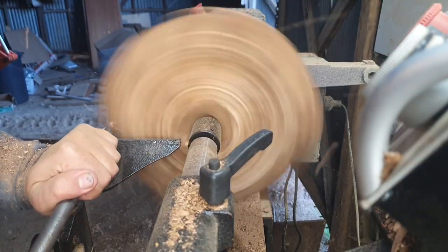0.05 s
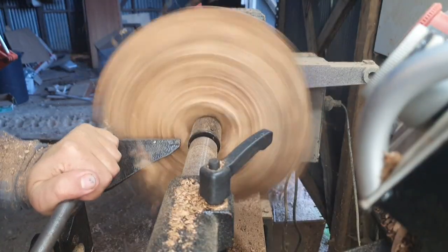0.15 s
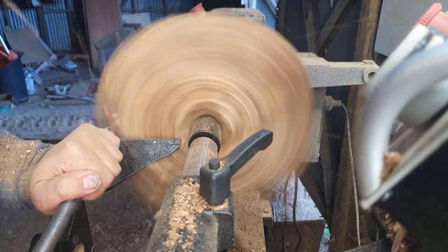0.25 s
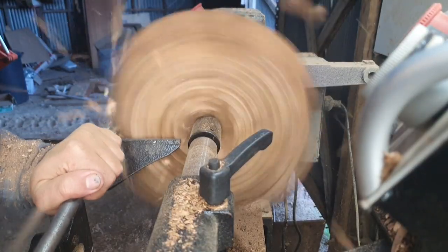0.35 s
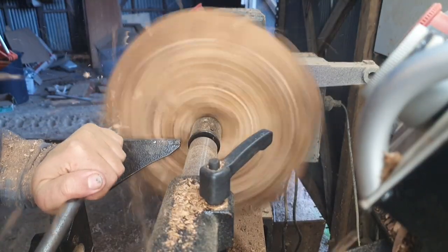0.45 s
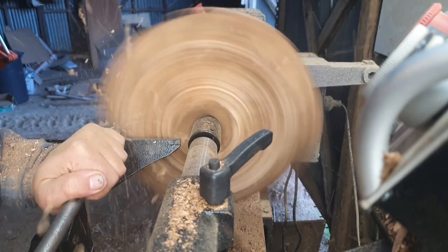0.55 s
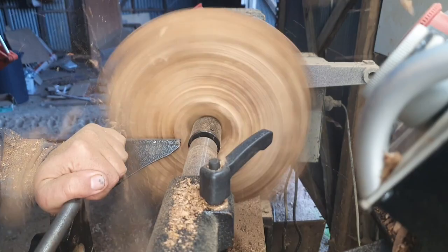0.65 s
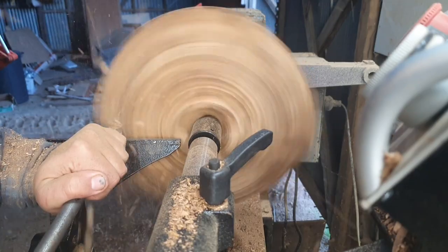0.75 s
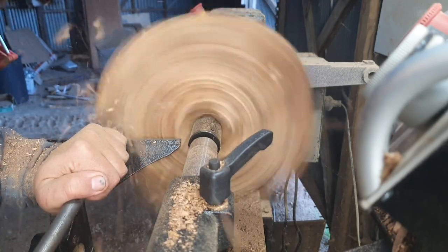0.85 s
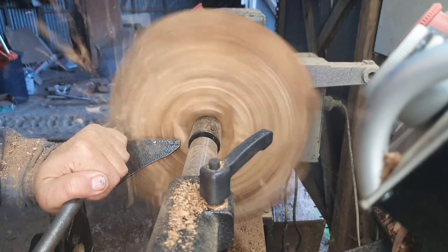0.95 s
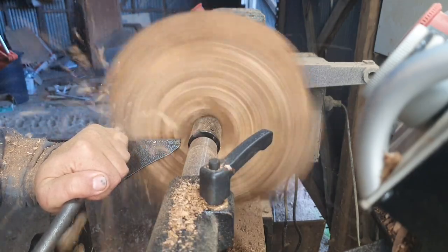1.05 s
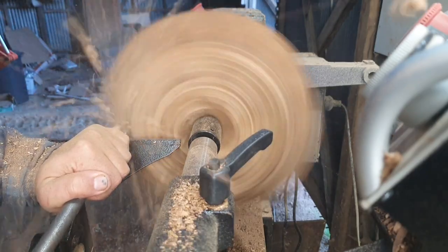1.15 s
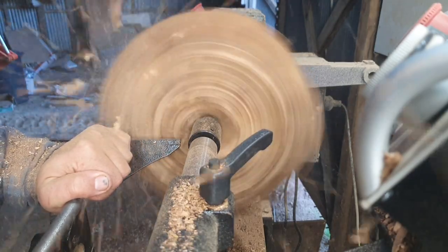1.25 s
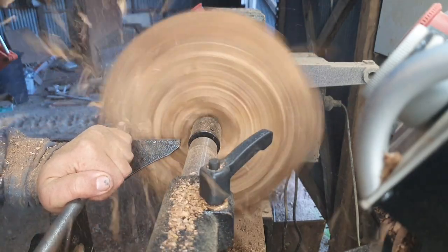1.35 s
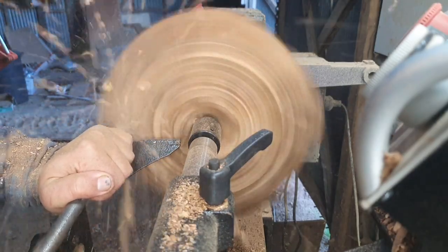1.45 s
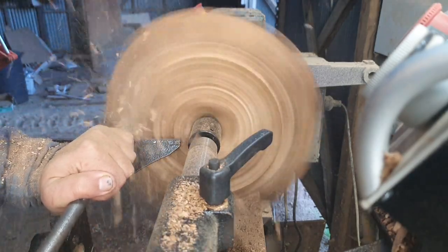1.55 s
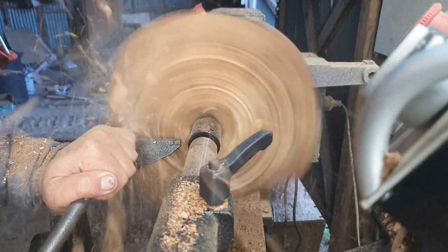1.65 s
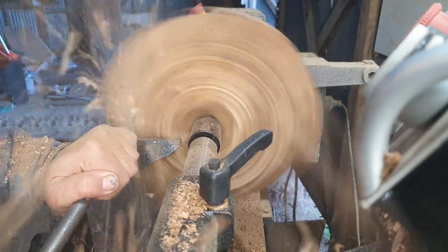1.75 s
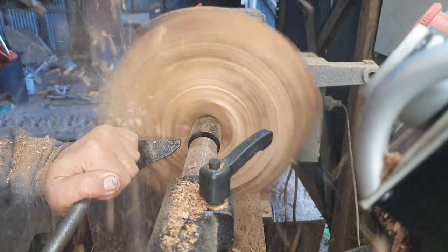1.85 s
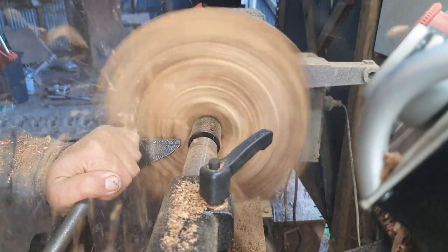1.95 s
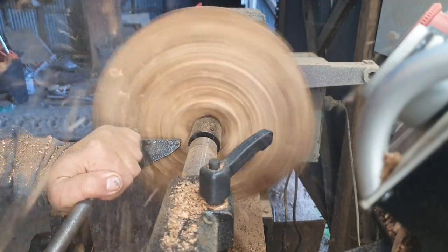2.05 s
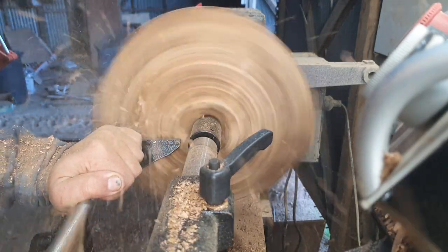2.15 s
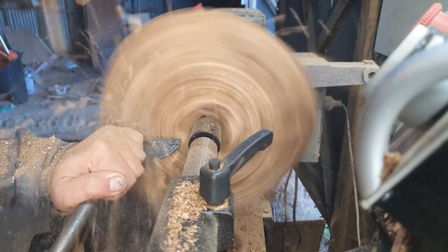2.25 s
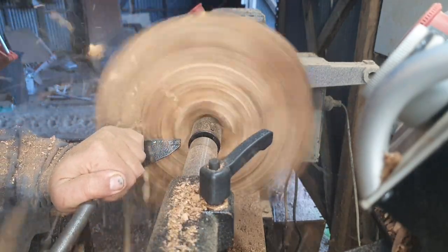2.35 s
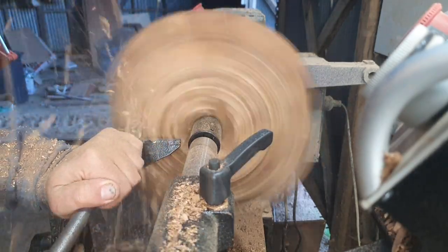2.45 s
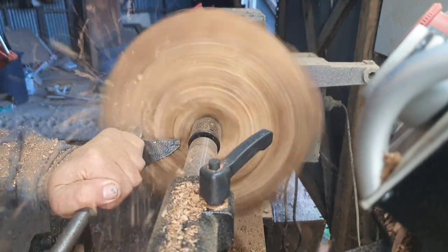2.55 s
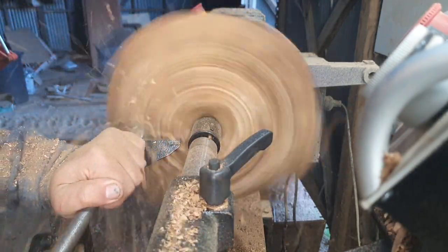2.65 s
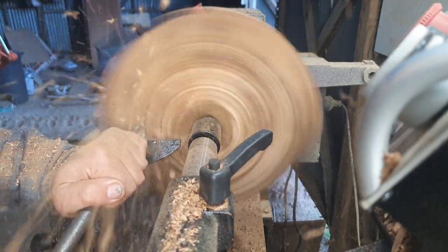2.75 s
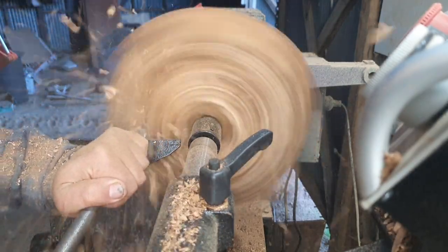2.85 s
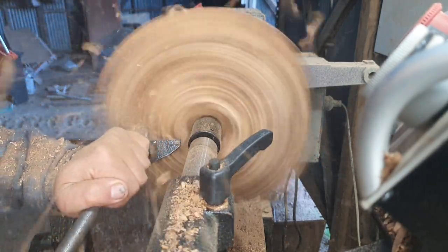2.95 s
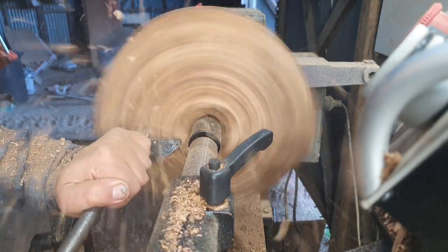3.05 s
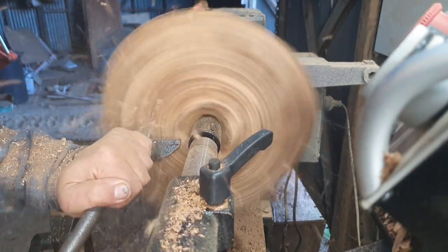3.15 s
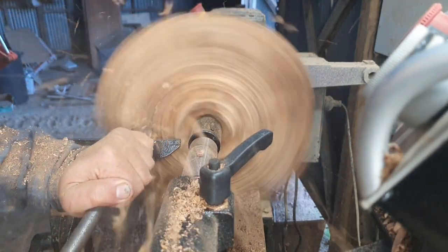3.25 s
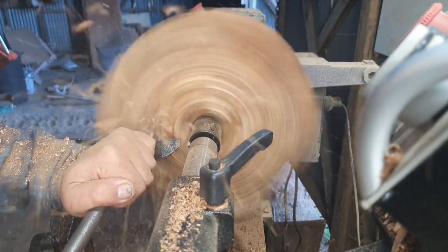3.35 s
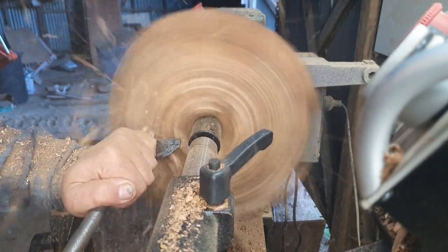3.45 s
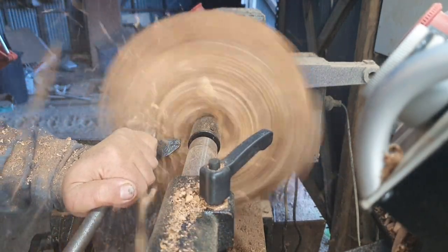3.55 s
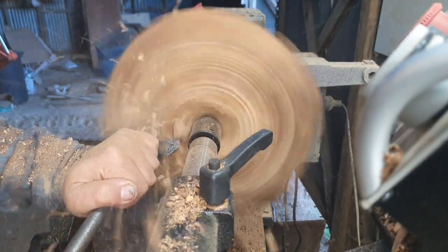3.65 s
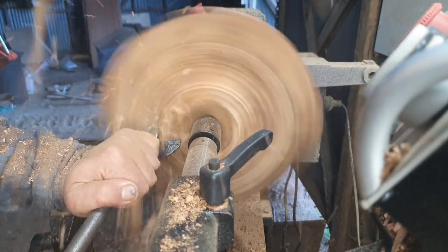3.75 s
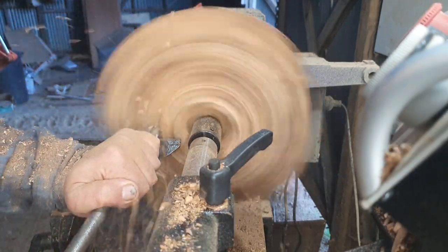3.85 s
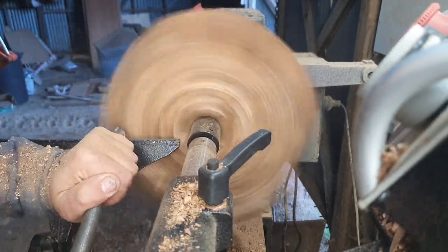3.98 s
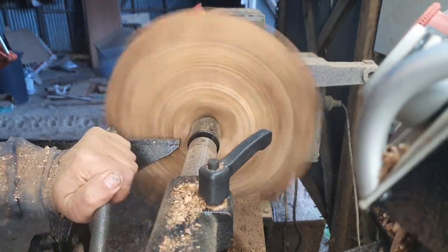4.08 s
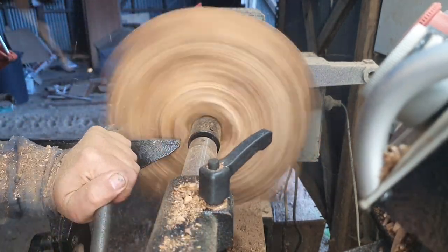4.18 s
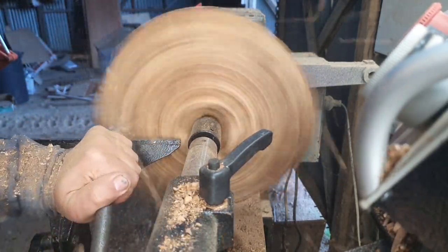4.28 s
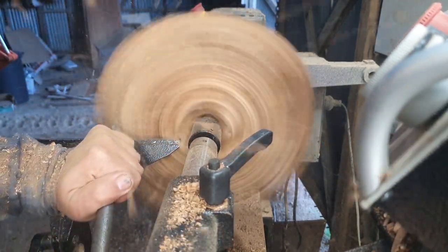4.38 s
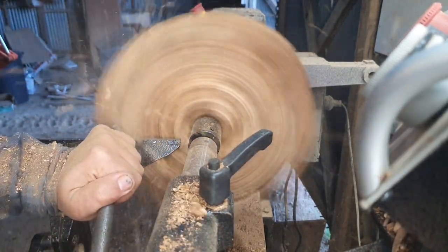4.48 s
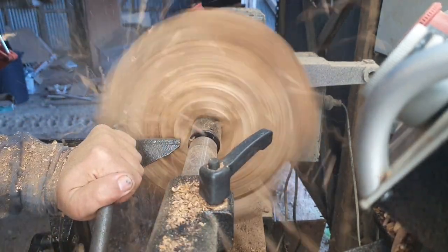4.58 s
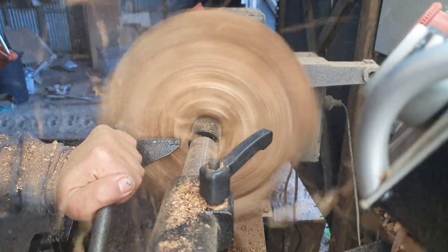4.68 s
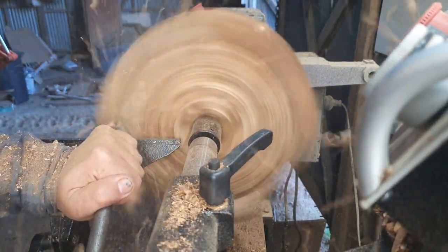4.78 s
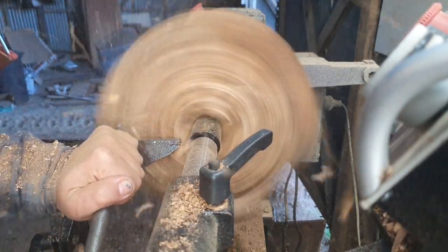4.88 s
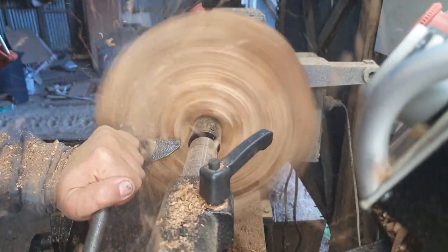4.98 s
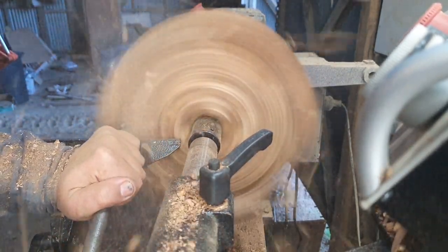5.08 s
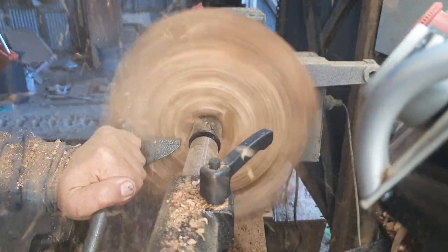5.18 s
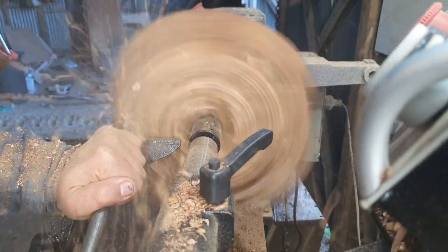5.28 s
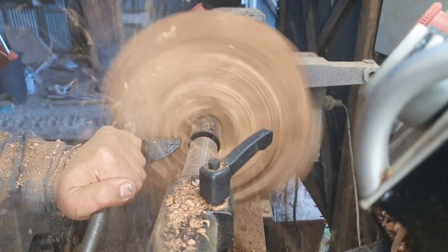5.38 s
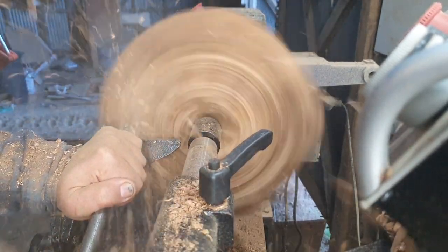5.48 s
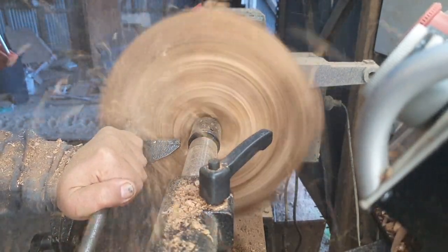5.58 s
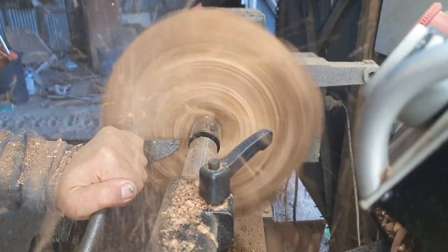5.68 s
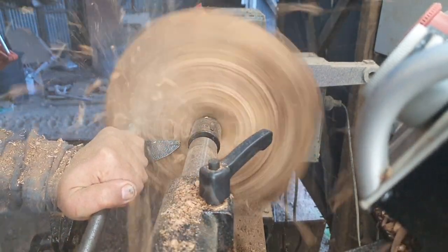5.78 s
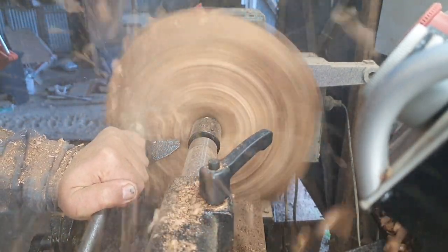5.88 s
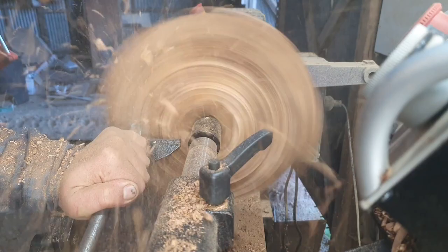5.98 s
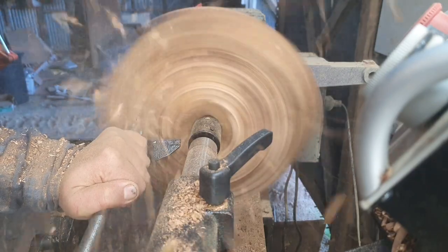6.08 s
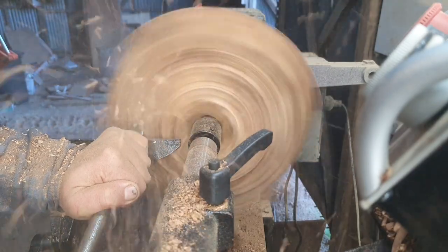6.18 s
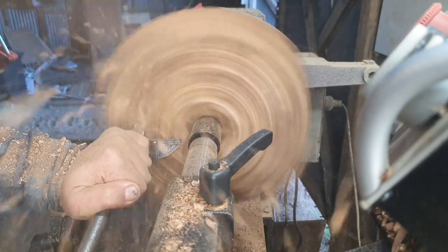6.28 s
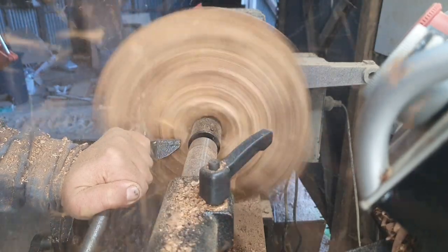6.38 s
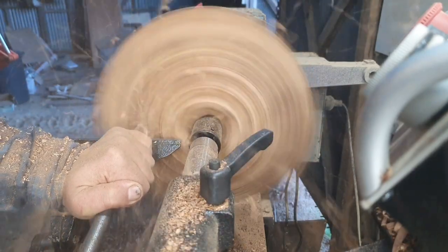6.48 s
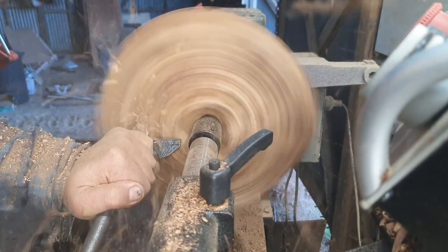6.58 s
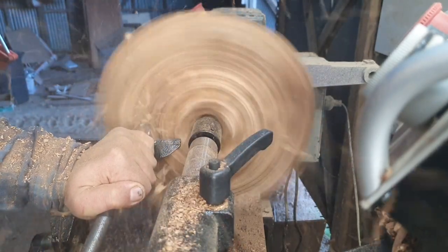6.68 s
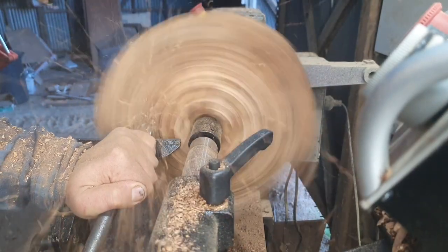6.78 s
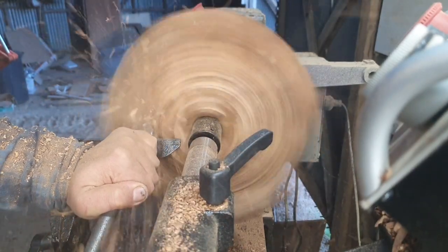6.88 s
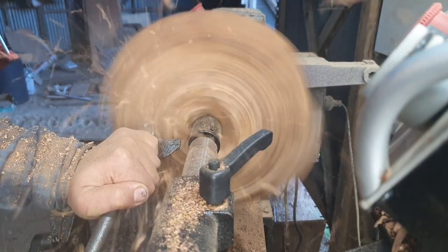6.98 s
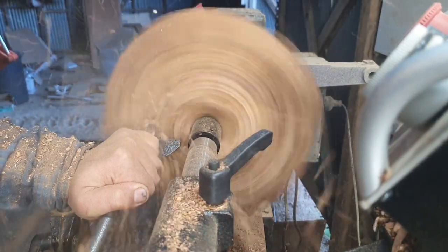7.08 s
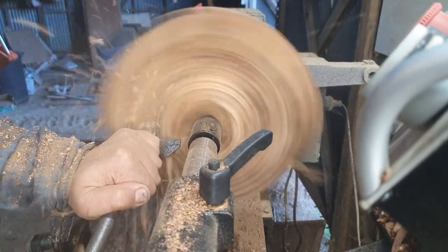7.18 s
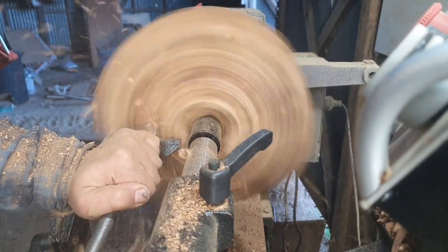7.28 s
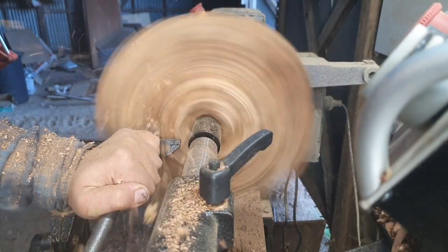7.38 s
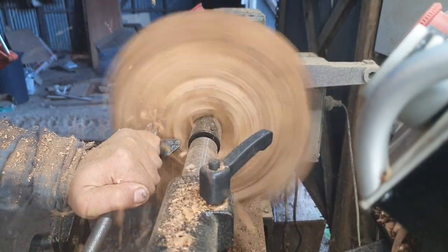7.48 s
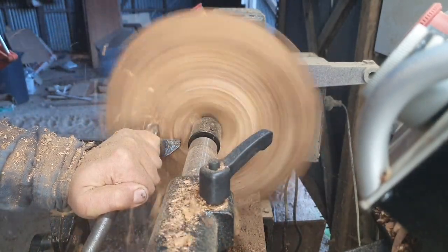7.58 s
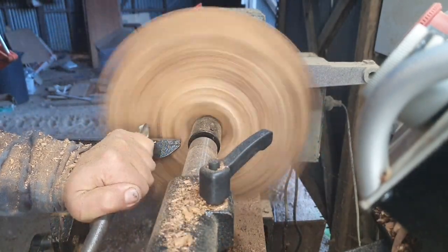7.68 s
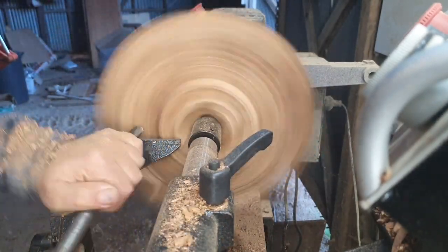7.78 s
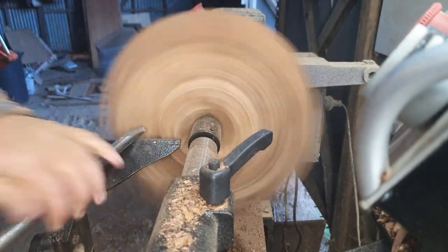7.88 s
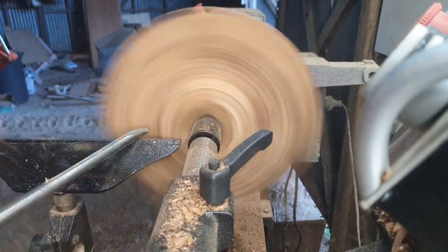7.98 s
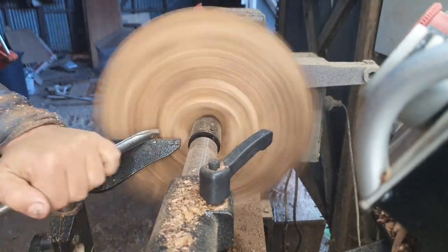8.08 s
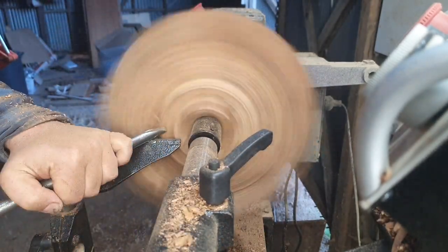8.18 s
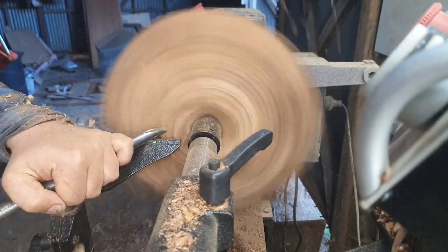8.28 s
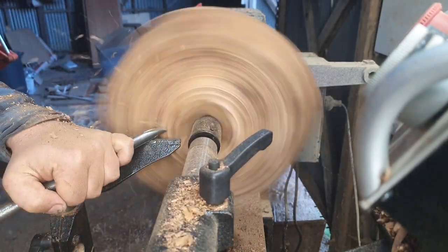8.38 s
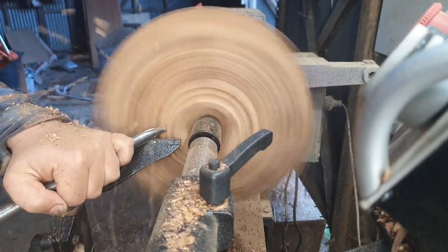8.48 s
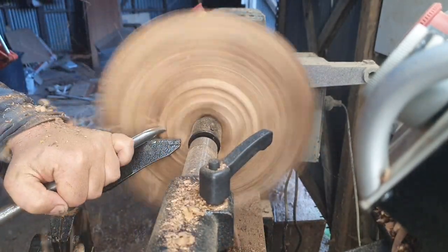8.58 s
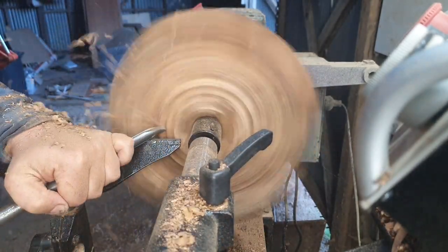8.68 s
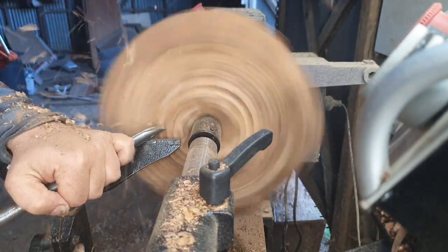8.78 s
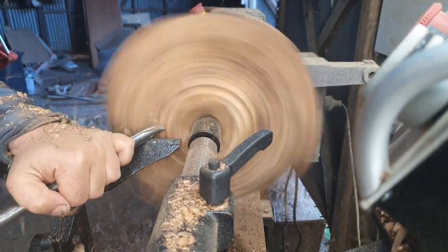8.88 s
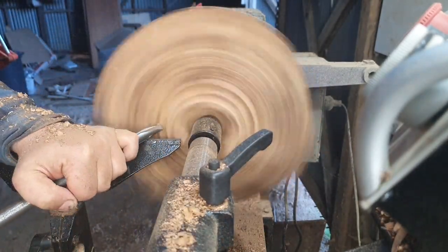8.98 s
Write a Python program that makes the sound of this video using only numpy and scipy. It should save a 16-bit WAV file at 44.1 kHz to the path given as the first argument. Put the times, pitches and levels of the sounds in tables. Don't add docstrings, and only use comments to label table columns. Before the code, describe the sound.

Harsh, buzzing scrape of steel cutting wood on a lathe, rattling with catches, stopping twice for short quiet pauses, then cutting again.

```python
import sys
import numpy as np
from scipy import signal
from scipy.fft import rfft, irfft, next_fast_len
from scipy.io import wavfile
from scipy.ndimage import uniform_filter1d, minimum_filter1d, map_coordinates

SR = 44100
rng = np.random.default_rng(int(sys.argv[2]) if len(sys.argv) > 2 else 0)


def generate_wav(sig):
    pcm = np.round(np.clip(np.atleast_2d(sig).T, -1, 1) * 32767).astype(np.int16)
    wavfile.write(sys.argv[1], SR, pcm)


def natural_amplitude(level_db):
    exponent = np.asarray(level_db, float) / 20
    return 10 ** exponent


N = 398223
TURNS_PER_S = 30.519

# edge meets wood t/s, starts to lift t/s, clear of the wood t/s
CUTTING_PASSES = [
    (0.0, 3.85, 3.91),
    (4.1445, 7.57, 7.68),
    (8.161, 9.02, 9.2),
]
# t/s, place (0 rim, 1 midway, 2 centre, 3 tool turned round)
EDGE_PLACE = [(0, 0), (.7, 0), (1.2, 1), (2.6, 1.2), (3.4, 2), (4, 2), (4.1, 0), (4.5, 0), (4.9, 1),
              (5.9, 1.2), (6.4, 2), (7.9, 2), (8, 3), (9.1, 3)]
# t/s, hiss level/dB, flute opening/dB, skew/dB
TOOL_PRESSURE = [(0.0, -28.5, -1, -1.5), (0.3, -31.5, 1.5, 4), (0.42, -25.5, 2, -1.5),
                 (0.8, -26, 1.5, -3.5), (1.2, -23.5, 0, -1), (1.75, -25.5, 1, 0), (2.56, -23, 1.5, 0.5),
                 (3.4, -21, -2, -3), (3.85, -22, -1.5, -6), (4.15, -32.5, 1, -0.5), (4.32, -25, 3.5, -1.5),
                 (4.97, -23.5, -4.5, -1), (6.1, -25, 1.5, 1.5), (6.45, -24.5, 1.5, 4.5),
                 (7.09, -21, 1.5, 0.5), (7.3, -27.5, -0.5, -0.5), (8.4, -24.5, 7, -0.5),
                 (8.86, -21.5, 4.5, 0.5)]
# t/s, lean to the left/dB, sheen of the top/dB
BODY_STANCE = [(0, -0.5, 1), (.6, -0.2, -1), (1.5, 0.5, -1.5), (2.2, -0.1, -2), (2.8, -0.5, -1),
               (3.8, 0, -1), (4.2, 0, -3), (4.7, 0.5, 5.5), (5.2, -0.5, 4), (5.7, .2, 0), (6.2, 0, 2.5),
               (7, 0, -1), (7.6, 0.2, 4), (8.2, -.3, 0), (9, 0, -10)]


def evened(x):
    return x / np.sqrt(np.mean(x ** 2) + 1e-20)


def read(points, hz, column=1):
    points = np.array(points)
    return np.interp(np.log(hz + 1), np.log(points[:, 0] + 1), points[:, column])


def bell(t, centre, half_width):
    return np.exp(-((t - centre) / half_width) ** 2)


def resonance(hz, centre_hz, width_hz):
    return 1 / (1 + (2 * (hz - centre_hz) / width_hz) ** 2)


def at_ports(same, other):
    # f/Hz, coherence (0-1), left minus right level/dB
    port_likeness = [(40, 0.9, 1), (152, 0.17, -1.5), (318, 1, 2.5), (610, 1, -1.5), (1456, 0.88, 0),
                     (2150, 0.93, 2.5), (3100, 0.51, 3), (4780, 0.64, -3.5), (5360, 0.22, -1.5),
                     (6960, 0.48, -2.5), (9300, 0.78, 0), (15000, 0.5, 1.5)]
    # f/Hz, phase by which the left leads/rad
    port_phase = [(0, 0), (2330, 0.2), (2760, 0.0), (3360, 1.1), (4050, 0.3), (4650, 0.3), (4910, -2.4),
                  (5340, -4.2), (5770, -4.4), (6720, -5.7), (7580, -12.8), (8180, -12.4), (10900, -12.7),
                  (16400, -12.5)]
    size = next_fast_len(N)
    hz = np.fft.rfftfreq(size, 1 / SR)
    like = np.clip(read(port_likeness, hz), 0, 1)
    left = rfft(same, size)
    shared = like * left * np.exp(-1j * read(port_phase, hz))
    right = shared + np.sqrt(1 - like ** 2) * rfft(other, size)
    lean = natural_amplitude(read(port_likeness, hz, column=2) / 2)
    return irfft(np.array([left * lean, right / lean]), size)[:, :N]


def shop(x):
    u = np.arange(9000) / SR
    arrivals = (rng.random((2, 9000)) < 2000 / SR) * rng.choice([-1., 1.], (2, 9000))
    taps = arrivals * natural_amplitude(-60 * u / 0.12) * (u > .004)
    return signal.oaconvolve(x, taps / np.linalg.norm(taps[0]), axes=1)[:, :N]


def idling(t):
    # start t/s, hush level/dB, hush swell/(dB/s), frame hum level/dB, hum fade/(dB/s)
    pauses = [
        (3.93, -68, 9, -49, -110),
        (7.68, -69, 20.5, -49, -500),
    ]
    # t/s, half length/s, rustle level/dB, air level/dB
    rustles = [(3.97, .02, 1, -4), (7.948, .02, 3.5, 15), (7.985, .02, 2, 11), (8.112, 0.0081, 5, -3)]
    first_tick_s, idle_turns_per_s = np.array([3.941, 7.684]), 32.9
    air_db, hum_floor_db = -10, -88
    pause = np.maximum(np.searchsorted(np.transpose(pauses)[0], t) - 1, 0)
    start, hush, swell, hum, fade = np.transpose(pauses)[:, pause]
    since = np.clip(t - start, 0, .5)
    hush_db = hush + swell * since + sum(db * bell(t, s, half) for s, half, db, _ in rustles)
    air_db = air_db + sum(db * bell(t, s, half) for s, half, _, db in rustles)
    turns = (t - first_tick_s[pause]) * idle_turns_per_s
    return hush_db, air_db, np.maximum(hum + fade * since, hum_floor_db) - hush_db, turns


def drive():
    # f/Hz, level/dB
    hush_spectrum = [(18, -60), (30, -33), (75, -23.5), (437, -7), (666, -18), (913, -17), (1010, -18),
                     (1910, -16), (2540, -15), (4650, -20), (5310, -24), (6300, -19), (8080, -23),
                     (16000, -52)]
    # f/Hz, width/Hz, level re hush/dB
    motor_tones = [(900, 6.6, -13), (3200, 97, -9), (4650, 300, -25)]
    whine_hz, whine_db = 899, -8
    size = next_fast_len(N)
    t, hz = np.arange(N) / SR, np.fft.rfftfreq(size, 1 / SR)
    hush_db, air_db, hum_db, turns = (np.interp(t, t[::32], c) for c in idling(t[::32]))
    noise = rfft(rng.standard_normal((2, N)), size)

    def shaped(gain):
        return evened(irfft(noise * gain, size)[:, :N])

    def peak(centre_hz, width_hz):
        return shaped(resonance(hz, centre_hz, width_hz))

    hush = natural_amplitude(6.5) * shaped(natural_amplitude(read(hush_spectrum, hz)) / (1 + (120 / (hz + 1)) ** 2))
    hush = hush + sum(natural_amplitude(db) * peak(f, w) for f, w, db in motor_tones)
    air = natural_amplitude(air_db + 3.5) * shaped(1 / (1 + (7000 / (hz + 1)) ** 4))
    hum = natural_amplitude(hum_db - 8.5) * (peak(455, 44) + peak(515, 36.1))
    tick = natural_amplitude(2.5) * peak(8000, 600) * np.exp(-(turns % 1) / 0.22)
    whine = natural_amplitude(whine_db) * np.sqrt(2) * np.sin(2 * np.pi * whine_hz * t)
    return at_ports(*(natural_amplitude(hush_db) * (hush + air + hum + tick + whine * [[1], [0]])))


def knocks():
    # t/s, f/Hz, width/Hz, level/dB, half length/s
    knock_events = [(3.96, 3100, 150, -66, .015), (3.985, 2300, 400, -69, .01),
                    (4.097, 3600, 600, -58, .003), (4.097, 6000, 900, -65, .003),
                    (4.105, 1360, 120, -58, .012), (7.662, 3730, 150, -52, .004),
                    (7.656, 6100, 700, -44, 0.0029), (7.775, 2500, 250, -63, 0.011),
                    (7.81, 2850, 120, -64, .025), (7.948, 4700, 1300, -49, .012),
                    (7.96, 3200, 150, -64, .05), (8.113, 1350, 200, -49, .004),
                    (8.113, 2900, 500, -56, .005)]
    out, u = np.zeros((2, N)), np.arange(-4096, 4096) / SR
    hz = np.fft.rfftfreq(len(u), 1 / SR)
    for s, centre_hz, width_hz, db, half_s in knock_events:
        noise = rng.standard_normal((2, len(u)))
        ring = irfft(rfft(noise) * resonance(hz, centre_hz, width_hz))
        first = round(s * SR) - 4096
        out[:, first:first + len(u)] += natural_amplitude(db) * evened(ring) * bell(u, 0, half_s)
    return at_ports(*out)


def angle():
    # t/s, turns behind the mean speed, depth of the flaw/dB
    turning = [(0.0, -0.02, 7.5), (0.3, -0.38, 4.5), (0.45, -0.33, 3.5), (0.75, -0.63, 6.5),
               (1.05, -0.92, 4.0), (1.5, -0.83, 3.3), (2.25, -0.97, 3.2), (2.55, -1.26, 3.0),
               (3.6, -1.67, 3.0), (3.85, -1.88, 1.2), (4.6, -1.95, 3.8), (4.9, -1.79, 4.2),
               (5.08, -1.5, 6.0), (5.36, -0.71, 4.5), (5.85, -0.62, 4.0), (6.9, -0.79, 2.8),
               (8.2, -1.1, 0.5), (9.0, -1.45, 2.8)]
    t = np.arange(N) / SR
    s, behind, flaw_db = np.transpose(turning)
    turns = t * TURNS_PER_S - uniform_filter1d(np.interp(t, s, behind), size=4000)
    return turns, np.interp(t, s, flaw_db)


def surface(turns, lasting, count, size):
    field = rng.standard_normal((300, count))
    field = signal.lfilter([1], [1, -np.exp(-1 / lasting)], field, axis=0)
    field = evened(uniform_filter1d(field, size=size, axis=1, mode="wrap"))
    return map_coordinates(field, [turns + 2, turns % 1 * count], order=3, mode="grid-wrap")


def fibres(repeat, count=320):
    turns = angle()[0]
    marks = np.array([surface(turns, lasting=5.0, count=count, size=1) for _ in range(2)])
    marks = evened(marks) * np.sqrt(count * TURNS_PER_S / SR)
    fresh = rng.standard_normal((2, N))
    return [np.sqrt(1 - r) * fresh + np.sqrt(r) * marks for r in np.clip(repeat, 0, 1)]


def bite(lumpy_db):
    turns, flaw_db = angle()
    from_flaw = (turns + .5) % 1 - .5
    flaw = -1.4 * flaw_db * bell(from_flaw, 0, 0.074)
    splinters = (rng.random(N) < 500 / SR) * natural_amplitude(5.7 * np.minimum(rng.exponential(1, N), 2.7))
    splinters = signal.lfilter([1], [1, -np.exp(-1 / (0.0018 * SR))], splinters)
    ridges = lumpy_db * surface(turns, lasting=3.7, count=64, size=3)
    return evened(natural_amplitude(flaw + ridges) * (1 + 0.16 * splinters))


def catches():
    # t/s, peak level/dB
    grain_catches = [(0.236, -8), (0.2847, -7.5), (0.33, -1), (0.3566, -10), (0.4795, -16), (0.5686, -3),
                     (0.6464, -2), (0.681, 0.5), (0.743, 4), (0.777, -3), (0.805, -9), (0.8831, -6),
                     (0.957, -7), (1.1191, -6), (1.15, -4), (1.2179, -25), (1.2518, -6), (1.425, 3),
                     (1.5791, 0), (2.0455, 0), (2.3683, -7), (2.4017, -10), (2.4381, -15), (2.4695, -7),
                     (2.6521, -6), (3.0048, -7), (3.0712, -1), (3.1999, -3), (3.234, 2), (3.4259, -5),
                     (3.6015, -3), (4.19, -10), (4.2732, -14), (4.305, -12), (4.3694, -11), (4.4483, -1),
                     (4.6323, -1), (4.6981, -5), (4.8303, -14), (4.8653, -18), (5.066, 3), (5.1462, -13),
                     (5.1776, -4), (5.19, 1), (5.1123, -2), (5.2533, -7), (5.2872, -4), (5.3576, -16),
                     (5.817, -0.5), (6.115, -10), (6.3026, -18), (6.498, -7), (6.7071, -6), (6.859, 8),
                     (7.1012, -5), (7.182, 1), (7.43, -3), (7.504, -1), (8.3707, -7), (8.707, -3)]
    # t/s, peak level/dB
    edge_grazes = [(3.901, -12), (3.9714, -47), (4.095, -45), (4.136, -11), (4.144, -4), (7.6526, -19),
                   (7.843, -41), (8.1114, -46), (8.1652, -10), (8.921, -6), (8.952, -16), (8.969, 2),
                   (8.984, 2), (9.0014, -5), (9.017, 4.5)]
    # first t/s, peak level/dB, snags, gap/s
    snag_runs = [(0.068, -3, 5, 0.0315), (1.0848, -2, 2, 0.053), (2.334, -30, 3, 0.063),
                 (3.168, -2, 4, 0.11), (5.113, -23, 3, 0.021), (7.1475, -9, 2, 0.09),
                 (7.2398, -33.5, 2, .0314)]
    snags = [(s + k * gap, db) for s, db, count, gap in snag_runs for k in range(round(count))]
    s, peak_db = np.transpose(grain_catches + edge_grazes + snags)
    train = np.zeros(N)
    train[(s * SR).astype(int)] = natural_amplitude(peak_db)
    u = np.arange(1500) / SR
    return signal.oaconvolve(train, (1 - np.exp(-u / 0.001)) * np.exp(-u / 0.0034))[:N]


def hand(fine):
    # t/s, level/dB, half length/s
    wavers = [(0.044, -4, 0.0062), (.061, -6, 0.0055), (0.097, -6, 0.0067), (0.126, -6, 0.0073),
              (0.155, -5, 0.0037), (0.19, 0, .004), (.665, -7, .006), (0.697, -6, 0.0061), (.765, -3, .006),
              (0.801, -2, 0.0059), (5.028, -5.5, 0.0057), (5.094, -5, .008), (5.14, -5, 0.0051),
              (0.222, -10, 0.0067), (0.253, 1, .006), (0.733, -16, 0.0054), (1.303, 0.5, 0.025),
              (1.359, -3.5, 0.011), (1.396, 2, 0.021), (2.303, 1.5, 0.017), (2.43, -7.5, 0.073),
              (4.177, -3, 0.0058), (4.683, -3, 0.0054), (4.783, -0.5, 0.11), (5.013, 2.5, 0.053),
              (5.455, -2, 0.033), (6.143, 3.5, 0.024), (6.235, -1.5, 0.11), (6.363, 2.5, 0.04),
              (7.127, -3, 0.11), (7.252, -4, 0.021), (7.56, 2, 0.26), (8.164, -12.5, 0.004),
              (8.174, -9, 0.004), (8.88, -4, 0.011), (8.944, -15, 0.034), (9.03, -20.5, 0.051)]
    # rest hum/dB, blank ring/dB, top fizz re hiss/dB, lumpiness/dB
    shares = [
        (-10.5, -4, -1, 2.5),
        (-13, -3.5, 2.5, 1.5),
        (-12, -4, 2.5, 1),
        (-12, -4, -0.5, 2),
    ]
    easing = (0.48, 0.28, 0.067, 0.31)
    # start t/s, end t/s, hum rise/dB, howl level re hiss/dB
    chatter = [(-0.1, 0.327, 4, -18), (1.13, 1.258, 2, -14.5), (1.274, 1.563, 2.5, -5),
               (1.586, 1.716, 4, -8.5), (2.55, 2.94, 2, -15), (3.06, 3.52, 1, -13.5),
               (3.557, 3.674, 3.5, -21), (3.72, 3.903, 3, -12.5), (4.25, 4.71, 2, -16),
               (4.83, 5.168, 1, -11.5), (8.195, 8.55, 5.5, -12.5), (8.558, 8.926, 7, -17)]
    usual_db, easing_most_db = -24, 9
    chatter_edge_s = 0.041
    lift_db = -47
    t = fine[::32]
    s, push_db, flute_db, _ = np.transpose(TOOL_PRESSURE)
    push_db = np.interp(t, s, push_db) + sum(db * bell(t, at, half) for at, db, half in wavers)
    eased = np.minimum(usual_db - push_db, easing_most_db)
    reach = np.interp(t, *np.transpose(EDGE_PLACE))
    hum_db, ring_db, fizz_db, lumpy_db = (np.interp(reach, range(len(shares)), share) + slope * eased
                                          for share, slope in zip(np.transpose(shares), easing))
    spells = np.array([np.clip(np.minimum(t - start, end - t) / chatter_edge_s + .5, 0, 1)
                       for start, end, _, _ in chatter])
    _, _, hum_rise_db, howl_db = np.transpose(chatter)
    chatter_db, howl = hum_rise_db @ spells, natural_amplitude(howl_db) @ spells
    lifting_db = sum(lift_db * (t <= clear) * np.maximum((t - lift) / (clear - lift), 0) ** 2
                     for _, lift, clear in CUTTING_PASSES)
    fizz_db = fizz_db + np.interp(t, s, flute_db)
    controls = push_db + lifting_db, hum_db, chatter_db, ring_db, fizz_db, lumpy_db, howl
    return [np.interp(fine, t, c) for c in controls]


def howling(force):
    howl_hz, howl_wander_hz, howl_smooth_s = 514, 4.02, 0.0059
    wander = evened(uniform_filter1d(rng.standard_normal(N), size=1200))
    tone = np.sqrt(2) * np.sin(2 * np.pi * np.cumsum(howl_hz + howl_wander_hz * wander) / SR)
    return uniform_filter1d(force, round(howl_smooth_s * SR)) * tone


def patchy(x, patchy_db):
    hz, t, z = signal.stft(x, SR, nperseg=512, noverlap=384)
    patches = uniform_filter1d(rng.standard_normal(z.shape[1:]), size=6, axis=0)
    patches = uniform_filter1d(patches, size=24, axis=1)
    skew_db = np.interp(t, *np.transpose(TOOL_PRESSURE)[::3]) * bell(hz, 8640, 1960)[:, None]
    sheen_db = np.interp(t, *np.transpose(BODY_STANCE)[::2]) * bell(hz, 14800, 700)[:, None]
    gain = natural_amplitude(patchy_db * evened(patches) + skew_db + sheen_db)
    return signal.istft(z * gain, nperseg=512, noverlap=384)[1][:, :N]


def causal(gain_db, size=9000):
    cepstrum = irfft(np.log(natural_amplitude(np.maximum(gain_db, -150))))
    cepstrum[1:len(cepstrum) // 2] *= 2
    cepstrum[len(cepstrum) // 2 + 1:] = 0
    taps = irfft(np.exp(rfft(cepstrum)))[:size]
    return taps / np.linalg.norm(taps)


def colours(place):
    # f/Hz, spectral level/dB
    broad_colour = [(18, -103), (30, -34), (184, -27), (355, -15.5), (512, -2), (569, -10), (844, -18.5),
                    (1010, -14.5), (1430, -9), (1540, -8), (3140, -9), (4300, -12), (7270, -9.5),
                    (14800, -13.5), (16000, -21)]
    # f/Hz, width/Hz, level/dB at each of the four places
    rest_modes = [(394.7, 7, 1, 9.5, 9.5, 10.5), (409, 11, 3.5, -14, -4, -6), (446, 30, 3.5, 4.5, 4, 2),
                  (482.7, 4.6, 6, -15.5, 5, -5), (515.6, 37, -2, 5.5, 7, 9.5),
                  (690, 12.8, 4.5, 9.5, 11, 12.5), (842, 39, 0, 12, 13.5, 12), (998, 97, -7, -13, -29, -22)]
    # f/Hz, width/Hz, level/dB at each of the four places
    blank_modes = [(1423.5, 32.4, 14, 16, 14, 15.5), (1780, 22, 0.5, 1, 3, 6), (1746, 94, 7.5, 6.5, 5, 1.2),
                   (2008, 46, 4.5, 5, 9, 7.5), (2304, 94, 9, 7, 4, 5), (2580, 44, 5, 3, 1.5, 5),
                   (2812, 97, 5, 5.5, 6.5, 3), (3180, 120, 8, 10.5, 11, 8), (3940, 64, -49, -21, -20, 5)]
    # f/Hz, width/Hz, level/dB at each of the four places
    steel_modes = [(5520, 14, 10.5, 12, 11.6, 14), (6000, 100, 6, 4.6, 9.2, 2), (6340, 134, 8, 6.1, 2.5, 9),
                   (7076, 127, 12.5, 11.6, 4.2, 7), (7507, 59, 10.5, 13, 8.3, -7.5),
                   (8510, 103, 0, 7.1, 7, 5.5), (9450, 77, 7.5, 15.6, 7.8, 8.5),
                   (10200, 125, 4, 4.6, 7.2, 5), (11040, 265, 3.5, 7.2, 8.3, 7.5),
                   (11900, 72, -2, 7.8, 4.1, -8), (14400, 300, 6.5, 1.5, 6.1, 0.5),
                   (15400, 170, 7, 0.5, 6.7, 6), (15740, 350, -4, 13, 12.3, 18)]
    # f/Hz, width/Hz, level/dB at each of the four places
    dead_spots = [(1300, 57, -7, -9.5, -7, -7.5), (2960, 120, 5, 3, -1.5, -8), (4350, 100, -8, -9, -17, -2),
                  (5280, 66, -5, -10, -3, -12), (13300, 300, -5, -9, 3, -4)]
    band_limits = [210, 1030, 4500, 12000]
    hz = np.fft.rfftfreq(16384, 1 / SR)
    modes = rest_modes + blank_modes + steel_modes + dead_spots
    bumps = [1 + (natural_amplitude(2 * m[2 + place]) - 1) * resonance(hz, m[0], m[1]) for m in modes]
    whole_db = read(broad_colour, np.minimum(hz, 15500)) + 10 * np.log10(np.prod(bumps, axis=0))
    below = [0 * hz] + [1 / (1 + (hz / limit) ** 16) for limit in band_limits] + [1 + 0 * hz]
    return [causal(whole_db + 10 * np.log10(abs(b - a) + 1e-9)) for a, b in zip(below, below[1:])]


def cutting():
    place_levels = [
        (-23, 2.5, 2.5),
        (-28.5, 0.86, -1.5),
        (-32, 0, -2.5),
        (-28, 0.8, -1),
    ]
    t = np.arange(N) / SR
    hiss_db, hum_db, chatter_db, ring_db, fizz_db, lumpy_db, howl = hand(t)
    touching = sum((t >= meet) & (t <= clear) for meet, _, clear in CUTTING_PASSES)
    grip, digs = bite(np.clip(lumpy_db, 0, 9)), catches()
    sharp = natural_amplitude(hiss_db) * touching * grip + 0.15 * digs
    dull = natural_amplitude(hiss_db) * touching * evened(grip ** 0.9) + 0.055 * digs
    noises = fibres(repeat=[.3, .8, .5, 0, 0])
    forces = [push * noise for push, noise in zip((dull, dull, dull, sharp, sharp), noises)]
    reach = np.interp(t, *np.transpose(EDGE_PLACE))
    low, high = np.zeros((2, 2, N))
    for place, (thud_db, _, scatter_db) in enumerate(place_levels):
        here = np.maximum(1 - abs(reach - place), 0) * natural_amplitude([[0], [scatter_db]])
        levels = (hum_db + thud_db, hum_db + chatter_db, ring_db, 0, fizz_db)
        bands = [signal.oaconvolve(here * force * natural_amplitude(db), taps[None], axes=1)[:, :N]
                 for force, db, taps in zip(forces, levels, colours(place))]
        low += sum(bands[:3])
        high += sum(bands[3:])
    low[0] += howling(howl * dull)
    lean_db = np.interp(reach, range(len(place_levels)), np.transpose(place_levels)[1])
    lean = natural_amplitude(lean_db + np.interp(t, *np.transpose(BODY_STANCE)[:2]))
    return at_ports(*low) + at_ports(*patchy(high, patchy_db=2.0)) * [lean, 1 / lean]


def scene():
    near = cutting() + drive() + knocks()
    return near + natural_amplitude(-41) * shop(near)


def band_limit(x):
    return signal.sosfilt(signal.butter(12, 16820, fs=SR, output="sos"), x)


def record(dry):
    lowpass = signal.firwin(901, 15730, window=("kaiser", 10), fs=SR)
    limited = signal.oaconvolve(dry, lowpass[None], "same", axes=1)
    peaks = -minimum_filter1d(-abs(limited).max(0), size=200)
    ducked = limited / np.maximum(1, uniform_filter1d(peaks, size=200) / .75)
    return band_limit(ducked)


dry = scene()
out = record(dry)
generate_wav(out)
```